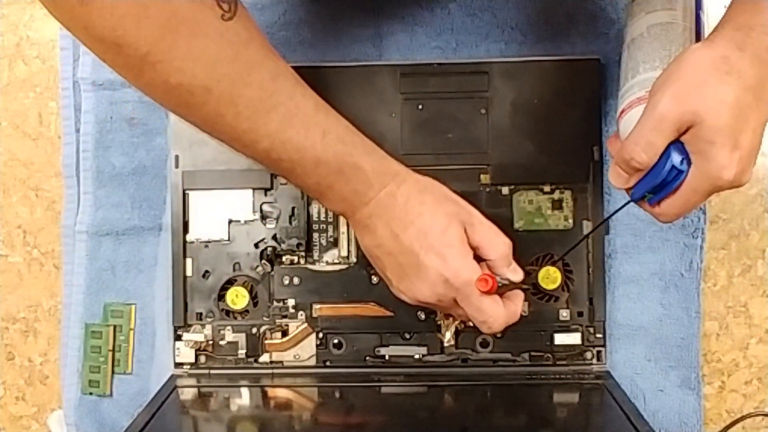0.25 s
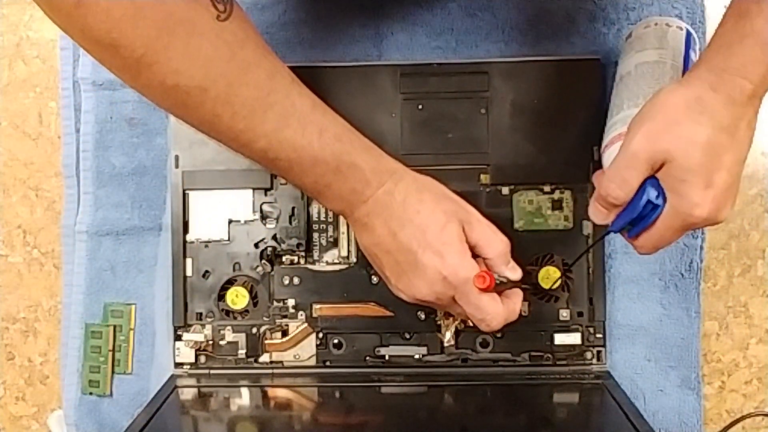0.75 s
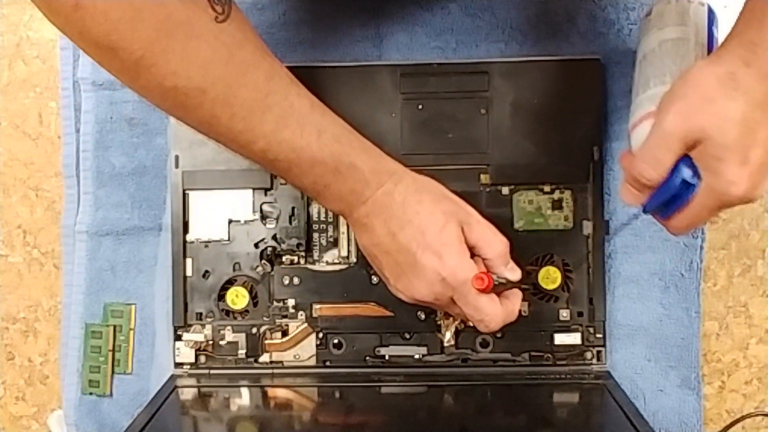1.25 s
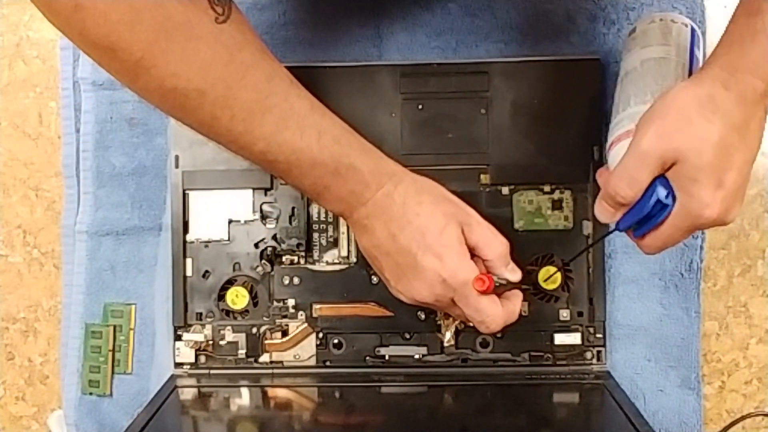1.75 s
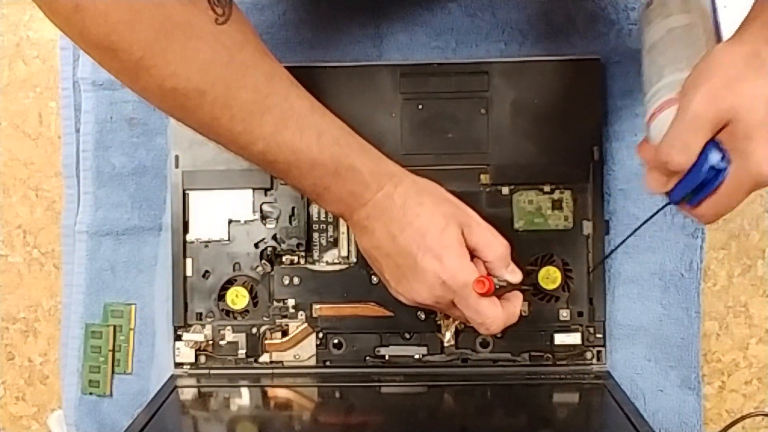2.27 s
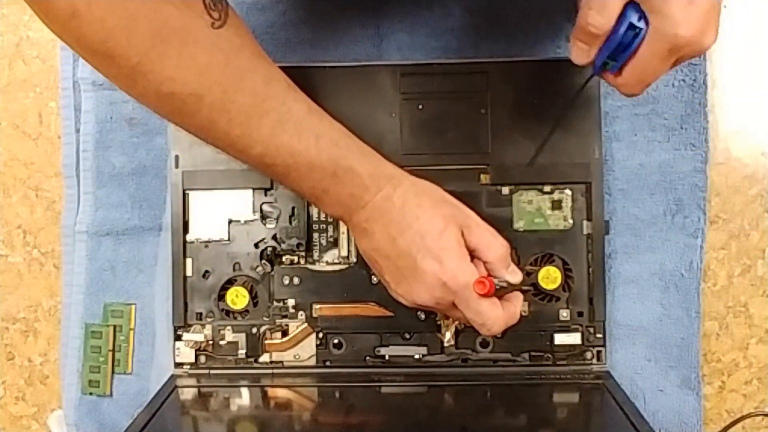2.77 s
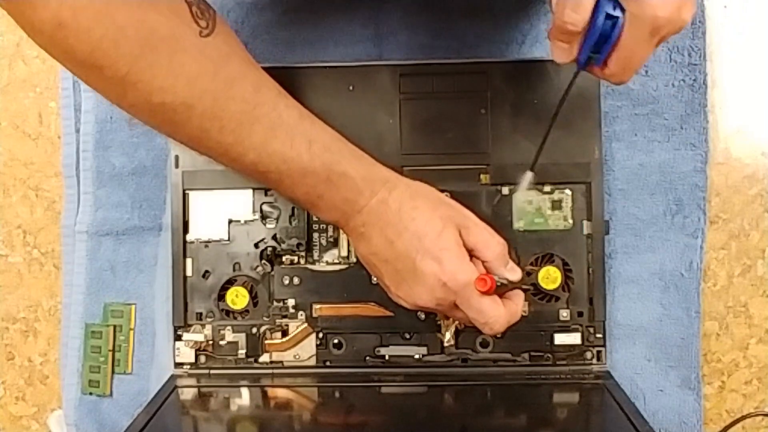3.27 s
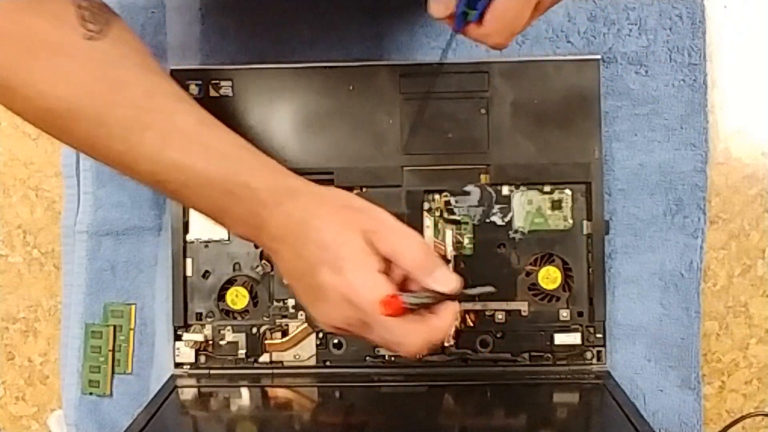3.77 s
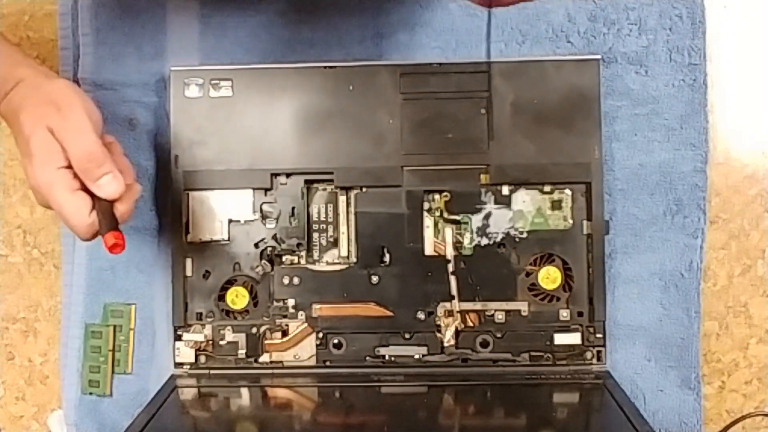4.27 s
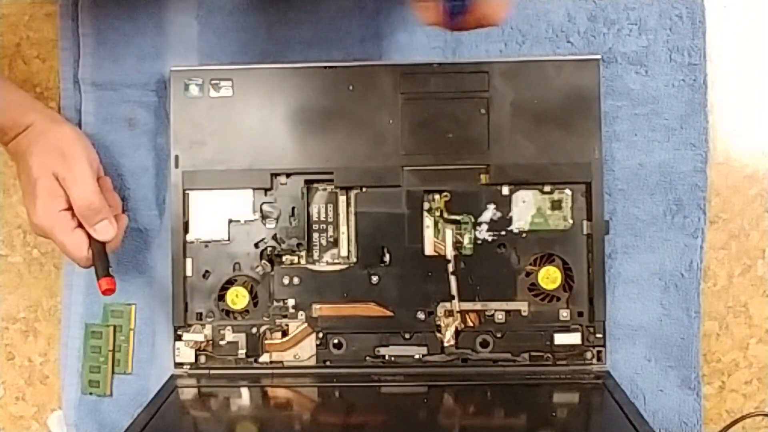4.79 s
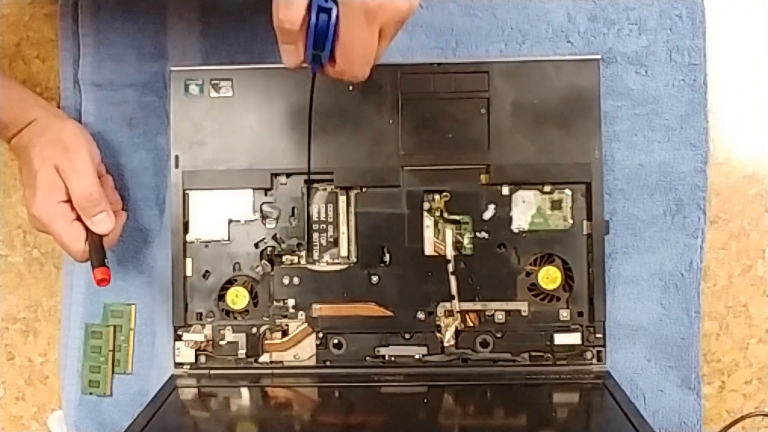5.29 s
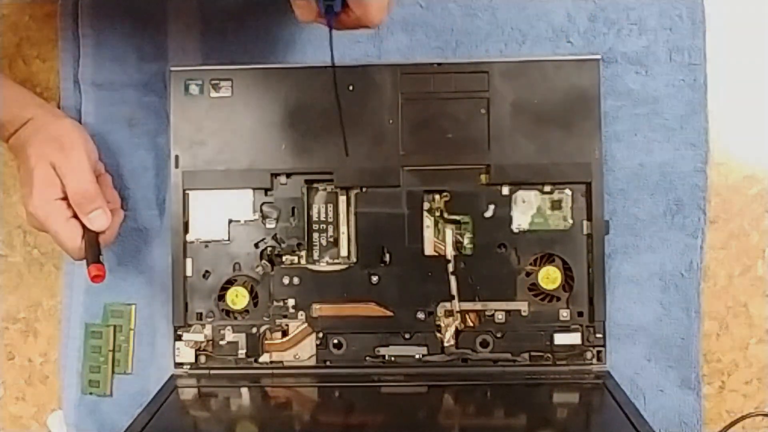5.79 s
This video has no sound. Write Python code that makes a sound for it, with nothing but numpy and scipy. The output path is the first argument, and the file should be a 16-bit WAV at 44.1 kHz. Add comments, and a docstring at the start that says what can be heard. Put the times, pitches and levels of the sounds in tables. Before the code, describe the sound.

Close, sharp blasts of pressurized air flutter over fan and circuit board in a small room, briefly interrupted once, above a faint low rumble.

```python
"""An air duster blows through its straw into an open laptop on a towel, under overhead stereo microphones.
The jet is four bands of shaped noise: low rush, roar of hollows, hiss of edges and treble sizzle. It flares
over the fan well, the valve shuts for a moment, then it sweeps the board and case with liquid ticks. Brief
noise bands add a trigger click, draughts on the microphones and passing colours of the moving jet.
Close reflections of a small room surround it; shaped noise makes the low rumble underneath."""
import sys
import numpy as np
from scipy import signal
from scipy.fft import rfft, irfft, next_fast_len
from scipy.io import wavfile
from scipy.ndimage import map_coordinates

SR = 44100
rng = np.random.default_rng(int(sys.argv[2]) if len(sys.argv) > 2 else 0)


def bounce(signal):
    """Save signal as a 16-bit WAV file at the path given by the first command-line argument."""
    frames = np.transpose(np.atleast_2d(signal))
    limited = np.clip(frames, -1, 1)
    pcm = np.round(limited * 32767).astype(np.int16)
    wavfile.write(sys.argv[1], SR, pcm)


N = 266408
TIME = np.arange(N) / SR
SIZE = next_fast_len(N + SR // 4)  # spare quarter second for filter tails
FREQ = np.maximum(np.arange(SIZE // 2 + 1) * SR / SIZE, 1)

# Flares: a first leak from the trigger, then edges (bright) and hollows (dark) that catch the jet;
# level is roar and hiss together before trim and gusts, brightness is hiss over roar:
# start_s, end_s, level_db, brightness_db
FLARES = [(0.162, 0.25, -42.5, -0.5), (0.41, 0.521, -11.5, 0), (0.532, 0.598, -12.5, 12),
          (0.669, 0.675, -5, 11.5), (0.71, 0.781, -23.5, 30), (0.806, 0.841, -11, 14),
          (0.907, 1.049, -13.5, 7.5), (0.998, 1.041, -14.5, 8), (1.044, 1.14, -17, 13),
          (1.146, 1.189, -14, -8), (1.209, 1.248, -16.5, -19), (1.248, 1.298, -17, 20),
          (1.332, 1.357, -16.5, 3), (1.412, 1.441, -12.5, -4), (1.439, 1.488, -17.5, 25),
          (1.481, 1.515, -16, -6), (1.577, 1.688, -12.5, 3.5), (1.772, 1.843, -13, 8),
          (1.975, 2.039, -13.5, 12.5), (2.113, 2.19, -13, 1.5), (2.183, 2.272, -16.5, -4),
          (2.362, 2.373, -9.5, 19), (2.386, 2.44, -18.5, 33.5), (2.47, 2.474, -12.5, 45),
          (2.65, 2.704, -16.5, 15.5), (2.709, 2.716, -12, 39), (2.833, 2.92, -18, 20),
          (3.09, 3.152, -15, 19), (3.343, 3.381, -15, 20), (3.644, 3.683, -15.5, 13),
          (3.827, 3.856, -16, -10), (4.12, 4.253, -19, -27), (4.448, 4.476, -15, -4),
          (4.618, 4.648, -15, -16), (4.887, 4.909, -13, -9), (5.033, 5.056, -18.5, -21),
          (5.247, 5.255, -3.5, -9), (5.268, 5.291, -12.5, 1), (5.529, 5.566, -12.5, -17),
          (5.78, 5.86, -22, -17), (5.905, 6.002, -19, 25)]
# The trigger: time_s, opening (0 shut to 1 open)
VALVE = [(.395, 0), (.415, 1), (2.265, 1), (2.275, 0), (2.355, 0), (2.363, 1)]
# Coloured puffs: a trigger click, low draughts buffeting the microphones, and bands of noise that swell
# as the jet moves; length runs from the centre to 17 dB down, width is nominal:
# centre_s, length_s, pitch_hz, width_hz, level_db
PUFFS = [(.172, .005, 2060, 600, -30), (0.846, 0.0085, 300, 260, -25.5), (1.599, 0.022, 1320, 900, -17),
         (2.023, 0.022, 1800, 1200, -15), (2.15, 0.017, 1750, 900, -9), (2.259, 0.02, 1090, 400, -15.5),
         (2.391, 0.03, 4840, 900, -14), (3.313, 0.03, 370, 300, -28), (3.472, 0.086, 3330, 900, -18.5),
         (3.663, 0.032, 3120, 910, -9.5), (3.941, .029, 368, 180, -29), (4.726, 0.04, 630, 450, -30),
         (4.772, 0.087, 950, 900, -17), (4.841, 0.045, 1580, 600, -16), (5.163, 0.067, 2770, 1100, -17.5),
         (5.2, 0.13, 306, 139, -31), (5.672, 0.12, 4100, 1200, -23.5), (5.977, .041, 2400, 800, -15),
         (5.98, 0.11, 5600, 1390, -14.5)]
# Resonances of the fan well and of the open case, nominal widths, relative levels:
# pitch_hz, width_hz, level_db
FAN_MODES = [(750, 85, -9), (1027, 110, -4), (1119, 51, 1.5), (1324, 120, -1.5), (1500, 200, -3.5),
             (1566, 150, -4.5), (1748, 39, 0.5), (2004, 200, 2), (2630, 790, -7)]
CASE_MODES = [(1025, 142, -0.5), (1368, 160, 3.5), (1434, 64, 2), (1548, 60, 3.5), (1733, 116, 3.5),
              (2065, 310, -1.5), (2394, 124, 3), (2720, 170, -1.5)]
# Low resonances of the shell under each place: pitch_hz, width_hz, level_db
FAN_LOW_MODES = [(293, 64, -6), (520, 550, -9), (650, 280, -6), (767, 28, 3)]
CASE_LOW_MODES = [(294, 81, -7), (478, 107, -1), (631, 160, 1), (780, 35, 1.5)]
# Noise colours, relative levels: frequency_hz, level_db
FAN_HISS = [(1700, -33), (2250, -6), (2530, 7), (2800, -6.5), (3150, 3.5), (3400, -1), (3850, 2.5),
            (4250, 3), (4750, 4), (5200, 4.5), (5750, 1), (6300, -9), (7200, -52)]
CASE_HISS = [(1500, -25), (2250, -4.5), (2550, -4), (3000, 0), (3500, 0.5), (3950, 0.5), (4450, 2.5),
             (5100, 2.5), (5750, 1.5), (6300, -14), (7200, -55)]
SIZZLE = [(5200, -35), (6100, -3), (6500, -3.5), (7500, 0), (8500, 2.5), (9600, -2.5), (10800, -6),
          (12100, -12), (12700, -37), (13300, -36), (14600, -33), (16000, -35)]
RUMBLE_COLOUR = [(15, -32), (28, -5), (42, -9), (58, 0), (77, 2.5), (105, -6.5), (150, -6), (210, -20.5),
                 (500, -24.5), (1300, -37.5), (3000, -41), (5200, -48), (6500, -55), (12000, -64)]
# Loudness of the room rumble: time_s, level_db
RUMBLE_LEVEL = [(0, -32.5), (.45, -29.5), (.6, -38), (2.5, -37), (5.3, -32.5), (6.04, -39)]
# Jet held on the fan well as the valve opens, before trim: rush_db, roar_db, hiss_db, sizzle_db
FAN_DB = (-36.5, -32, -21.5, -24.5)
# Its drift as the can cools, in dB per second: rush, roar, hiss, sizzle
FAN_DRIFT_DB_PER_S = (2.5, 2, -0.5, 1.45)
# Jet travelling over board and case, before trim: time_s, rush_db, roar_db, hiss_db, sizzle_db
CASE_LEVELS = [(2.5, -38.5, -33.5, -24, -24), (2.62, -39, -32, -20.5, -19),
               (3.1, -34.5, -30.5, -19.5, -15.5), (3.29, -30, -33, -25, -31.5),
               (3.45, -29, -23.5, -19, -26), (3.63, -28.5, -32.5, -26.5, -29), (3.67, -25, -16.5, -20, -34),
               (3.72, -36, -28.5, -25, -31), (3.86, -28, -22.5, -25, -31), (4.01, -21.5, -25, -21, -27.5),
               (4.22, -29.5, -20.5, -22.5, -25), (4.32, -24, -22, -22.5, -26.5),
               (4.62, -29.5, -20.5, -21.5, -23), (4.72, -21, -20.5, -21.5, -25),
               (5.01, -30, -20, -21.5, -24), (5.76, -30.5, -25, -21.5, -26.5)]
# Level trim added over the case: rush_db, roar_db, hiss_db, sizzle_db
CASE_TRIM_DB = (4, 0, 2.5, 1.5)
# Left minus right sensitivity of the microphones: frequency_hz, balance_db
MICROPHONE_BALANCE = [(250, 0.6), (700, 1.5), (1400, -0.9), (2000, -0.5), (3200, -2), (5400, 1),
                      (6600, -2.5), (9000, -3), (12000, 0)]

LEAVES_FAN_S = 2.35
FLARE_ATTACK_S, FLARE_RELEASE_S = 0.0023, .012
RUSH_UNDER_ROAR_DB, SIZZLE_UNDER_HISS_DB = -17, -11.5
SIZZLE_PER_BRIGHTNESS = 0.39  # dB per dB: sharp edges sizzle more
# Place is the lag of the left microphone: steady at the fan, then drifting left in even sweeps.
FAN_LAG_MS, CASE_LAG_MS, DRIFT_MS_PER_S, SWING_MS = .16, 0.098, 0.039, 0.038
MOVES_ON_S, SWEEPS_FROM_S = (3.0, 3.3), (3.5, 3.9)  # start and end of each fade
RIGHTMOST_S, SWEEP_PERIOD_S = 4.77, .385
SWING_RUSH_DB = -0.5  # multiplies a swing of -1 to 1: less rush at the right end
HOLLOW_STEALS_DB = -5.5  # gas that pours into a hollow no longer hisses over the surface
HOLLOW_FULL_DB = -17.5  # flare roar at which all of the jet is inside the hollow


def undb(db):
    """Turn decibels into gain."""
    return 10 ** (np.asarray(db) / 20)


def unit(x):
    """Scale to rms 1."""
    return x / np.sqrt(np.mean(x ** 2))


def curves(rows):
    """Join each column of a table by straight lines in time."""
    s, *columns = np.transpose(rows)
    return [np.interp(TIME, s, column) for column in columns]


def filtered(x, gain):
    """Apply a gain at each frequency."""
    return irfft(rfft(x, SIZE) * gain, SIZE)[..., :N]


def noise(gain):
    """Make random noise of rms 1 with the given gain at each frequency."""
    return unit(filtered(rng.standard_normal(SIZE), gain))


def colour(points):
    """Draw a gain curve through points, straight in dB over log frequency."""
    hz, db = np.transpose(points)
    return undb(np.interp(np.log(FREQ), np.log(hz), db))


def resonances(modes, skirt=1.46):
    """Add the powers of independently stirred resonances; a larger skirt steepens their sides."""
    power = 0
    for hz, width, db in modes:
        detune = (FREQ / hz - hz / FREQ) * hz / width
        power = power + undb(db) ** 2 / (1 + detune ** 2) ** skirt
    return np.sqrt(power)


def walk(top_hz):
    """Wander randomly and smoothly with rms 1, mostly below `top_hz`."""
    return noise(1 / (1 + (FREQ / top_hz) ** 4))


def rumble(side_db=-17):
    """Low room noise is nearly the same at both microphones: a strong middle and a faint side."""
    shape = colour(RUMBLE_COLOUR)
    mid, side = noise(shape), undb(side_db) * noise(shape)
    return undb(curves(RUMBLE_LEVEL)[0]) * np.array([mid + side, mid - side])


def microphones(x, shade_db_per_ms=9):
    """The further right the jet lands, the later and weaker it reaches the left microphone."""
    lag_ms = place_ms()
    left = map_coordinates(x, [np.arange(N) - lag_ms * SR / 1000], order=3)
    shade = undb(shade_db_per_ms * lag_ms / 2)  # half the difference on each side
    return np.array([left / shade, x * shade])


def room(direct, sideways, t60_s=0.1, gap_s=0.00189, wet_db=1.5, apart_hz=1500):
    """Sideways sound returns as quickly dying reflections that set the microphones apart in the treble."""
    after = np.maximum(TIME - gap_s, 0)
    decay = (after > 0) * np.exp(-np.minimum(np.log(1000) * after / t60_s, 20))
    tail = rng.standard_normal((2, N)) * decay
    tail = tail / np.sqrt(np.sum(tail ** 2, axis=1, keepdims=True))
    wet = undb(wet_db) * FREQ / np.hypot(FREQ, apart_hz)
    total = np.sqrt(1 + wet ** 2)  # keeps the summed power of direct and reflected sound
    straight = filtered(microphones(direct), 1 / total)
    reflected = filtered(sideways, rfft(tail, SIZE) * wet / total)
    return straight + reflected


def wandering(x, depth_s=.0011, top_hz=3):
    """The hand never keeps still: a wandering delay slides resonances by about a percent."""
    place = np.arange(N) + depth_s * SR * walk(top_hz)
    return np.array([map_coordinates(row, [place], order=3, mode="mirror") for row in x])


def swing():
    """The hand goes evenly to and fro over the case, -1 (left) to 1 (right)."""
    fade_in = np.interp(TIME, SWEEPS_FROM_S, (0, 1))
    return fade_in * np.cos(2 * np.pi * (TIME - RIGHTMOST_S) / SWEEP_PERIOD_S)


def place_ms():
    """Where the jet lands sets the lag of the left microphone."""
    moved = np.interp(TIME, MOVES_ON_S, (0, 1))
    drift = DRIFT_MS_PER_S * np.maximum(TIME - SWEEPS_FROM_S[1], 0)
    over_case = CASE_LAG_MS - drift + SWING_MS * swing()
    return (1 - moved) * FAN_LAG_MS + moved * over_case


def puffs():
    """Each click, draught or passing colour of the jet is one band of noise that swells and fades."""
    total = np.zeros(N)
    for centre, length, hz, width, db in PUFFS:
        swell = np.exp(-2 * ((TIME - centre) / length) ** 2)
        total += undb(db) * swell * noise(resonances([(hz, width, 0)], skirt=2.04))
    return total


def droplets(per_s=220, spread_db=5.0, level_db=-12):
    """Once the can is tipped, liquid spits out and ticks on the case as short filtered impulses."""
    tipped = np.clip((TIME - 3.2) / .5, 0, 1)
    hits = rng.random(N) < per_s / SR
    ticks = hits * undb(spread_db * np.minimum(rng.exponential(size=N), 3))
    ticks = ticks * rng.choice([-1, 1], N)
    ticks = filtered(ticks, resonances([(3230, 3000, 0)], skirt=4.7))
    return undb(level_db) * tipped * unit(ticks)


def gusts(flutter_db=1.17, roar_db=1.0, hiss_db=0.95, sizzle_db=0.85):
    """The whole jet flutters, and eddies of each size wobble rush, roar, hiss and sizzle."""
    hollows, edges = roar_db * walk(32), hiss_db * walk(42)
    layers = np.array([hollows, hollows, edges, edges + sizzle_db * walk(34)])
    return undb(flutter_db * walk(43) + layers)


def steady_jet():
    """The valve feeds rush, roar, hiss and sizzle, first on the fan well, then over the case."""
    on_fan = np.array(FAN_DB)[:, None] + np.outer(FAN_DRIFT_DB_PER_S, TIME - VALVE[0][0])
    on_case = np.array(curves(CASE_LEVELS)) + np.array(CASE_TRIM_DB)[:, None]
    on_case[0] += SWING_RUSH_DB * swing()
    return undb(np.where(TIME < LEAVES_FAN_S, on_fan, on_case)) * curves(VALVE)[0]


def flare_layers(db, bright_db):
    """Brightness shares a flare between roar and hiss; rush goes with the roar, sizzle with the hiss."""
    roar = undb(db) / np.hypot(1, undb(bright_db))
    hiss = roar * undb(bright_db)
    sizzle_db = SIZZLE_UNDER_HISS_DB + SIZZLE_PER_BRIGHTNESS * max(bright_db, 0)
    return np.array([roar * undb(RUSH_UNDER_ROAR_DB), roar, hiss, hiss * undb(sizzle_db)])


def strengths():
    """Flares rise, hold and fall, adding their power to the layers of the steady jet."""
    flare_power = np.zeros((4, N))
    for start, end, db, bright_db in FLARES:
        rise, fall = (TIME - start) / FLARE_ATTACK_S, (end - TIME) / FLARE_RELEASE_S
        window = np.clip(np.minimum(rise, fall) + .5, 0, 1)
        on = window > 0
        flare_power[:, on] += np.outer(flare_layers(db, bright_db), window[on]) ** 2
    filled = np.minimum(flare_power[1] / undb(HOLLOW_FULL_DB) ** 2, 1)
    in_fan_well = filled * (TIME < LEAVES_FAN_S)
    steady = steady_jet()
    steady[2:] *= undb(HOLLOW_STEALS_DB * in_fan_well)  # hiss and sizzle give way
    return np.sqrt(steady ** 2 + flare_power)


def jet(strength):
    """Turbulence stirs the hollows under the straw and hisses on their edges."""
    rush, roar, hiss, sizzle = strength
    at_fan = TIME < LEAVES_FAN_S
    low_rush = rush * np.where(at_fan, noise(resonances(FAN_LOW_MODES)), noise(resonances(CASE_LOW_MODES)))
    hollows = roar * np.where(at_fan, noise(resonances(FAN_MODES)), noise(resonances(CASE_MODES)))
    edges = hiss * np.where(at_fan, noise(colour(FAN_HISS)), noise(colour(CASE_HISS)))
    treble = sizzle * noise(colour(SIZZLE))
    # final trim of each layer in dB
    body = undb(-3.5) * low_rush + undb(1.88) * hollows
    air = undb(-0.47) * edges + undb(-0.74) * treble
    return body + air + hiss * droplets()


def scene():
    """The jet and its puffs sound in the room over the rumble; separate eddies radiate up and sideways."""
    strength = strengths() * gusts()
    coloured_puffs = puffs()
    upwards = jet(strength) + coloured_puffs
    sideways = jet(strength) + coloured_puffs
    return wandering(room(upwards, sideways)) + rumble()


def record(dry):
    """Each microphone has its own colour, the left loses more bass; peaks clip and the top is cut."""
    left_cut_hz, top_hz = 75, 15800
    tilt = np.sqrt(colour(MICROPHONE_BALANCE))  # half the balance on each side
    bass_cut = 1j * FREQ / (left_cut_hz + 1j * FREQ)
    heard = np.clip(filtered(dry, np.array([tilt * bass_cut, 1 / tilt])), -1, 1)
    top_cut = signal.ellip(8, .2, 70, top_hz, fs=SR, output="sos")
    return signal.sosfilt(top_cut, heard)


dry = scene()
out = record(dry)
bounce(out)
```